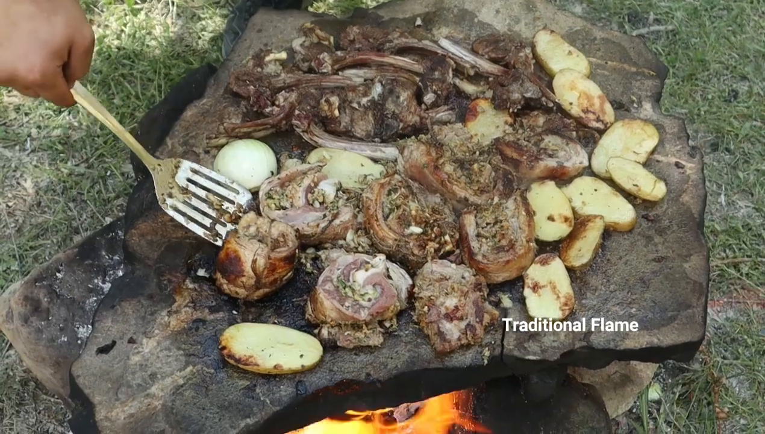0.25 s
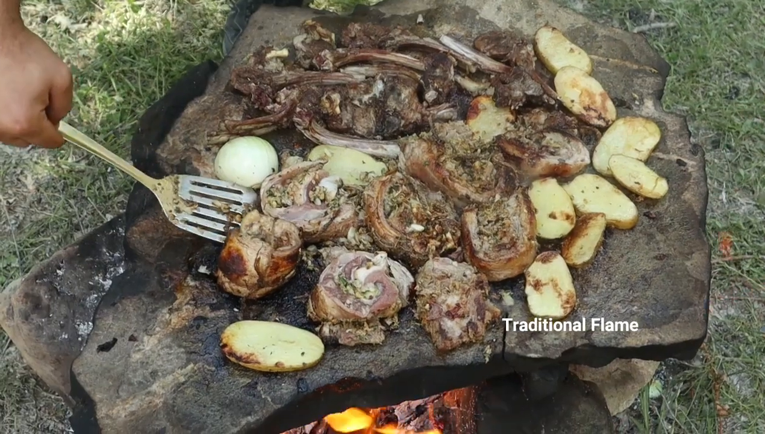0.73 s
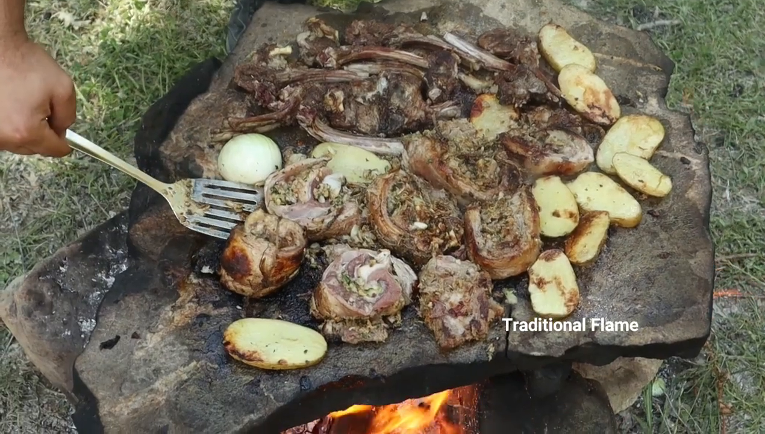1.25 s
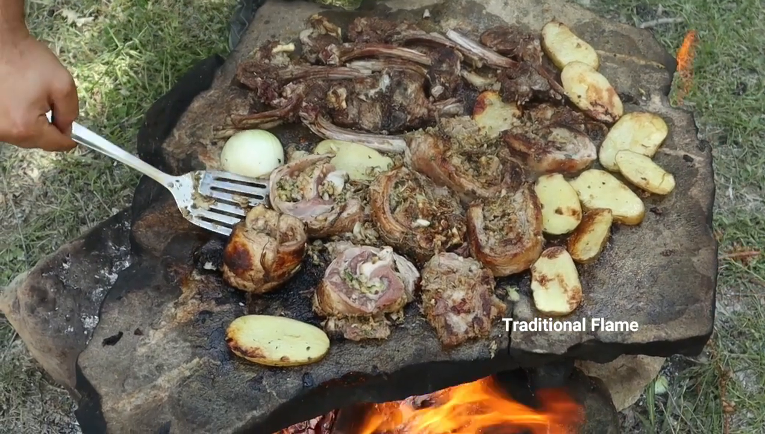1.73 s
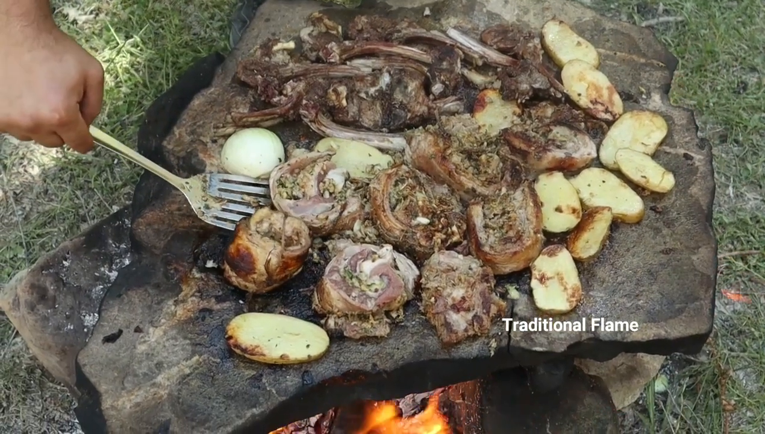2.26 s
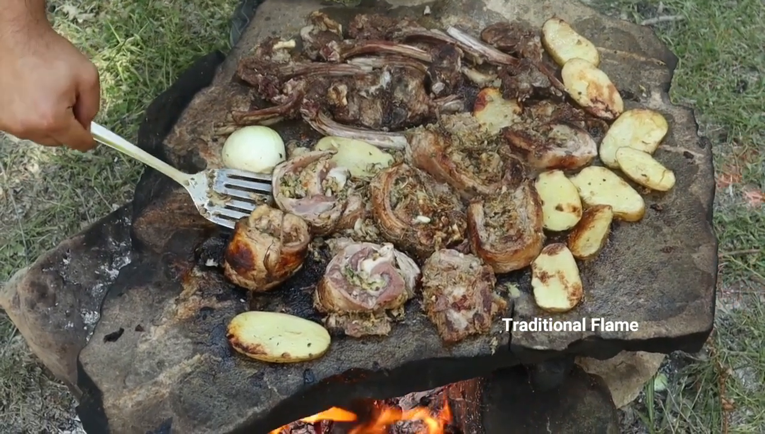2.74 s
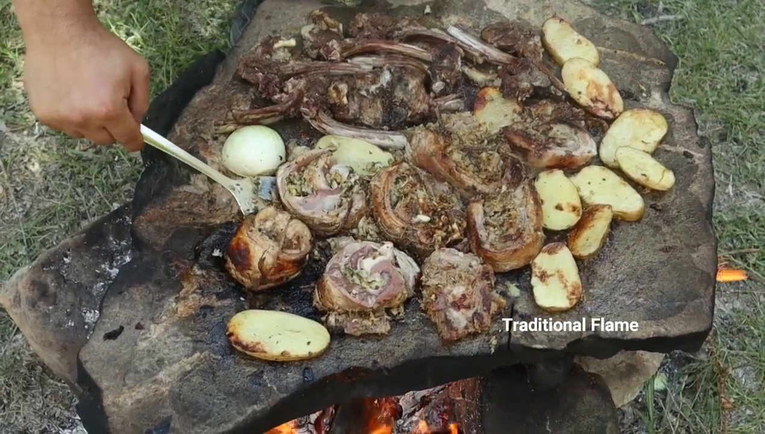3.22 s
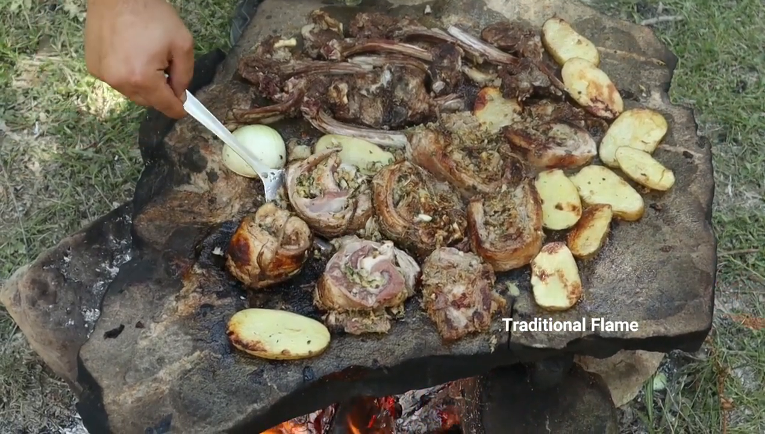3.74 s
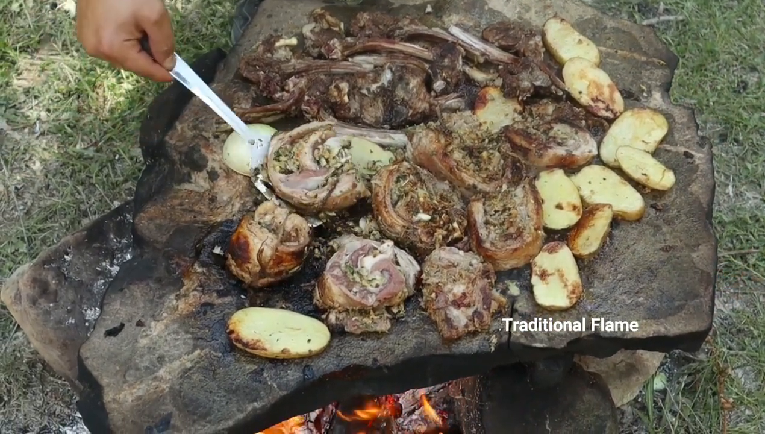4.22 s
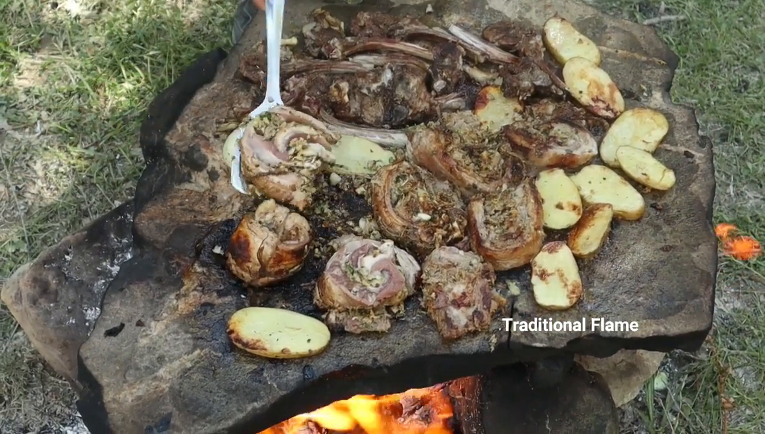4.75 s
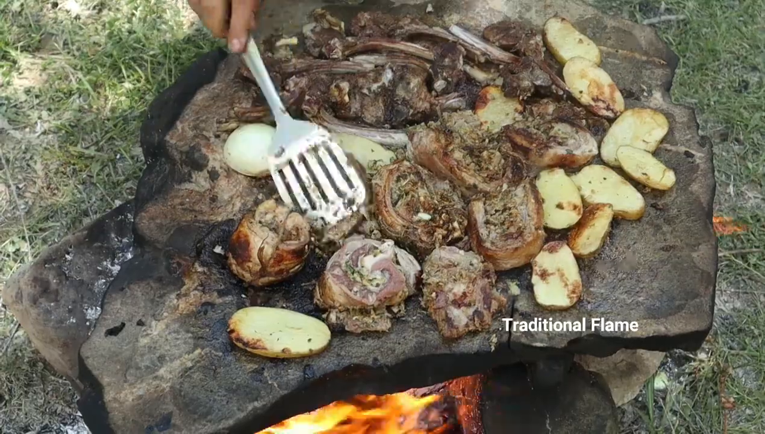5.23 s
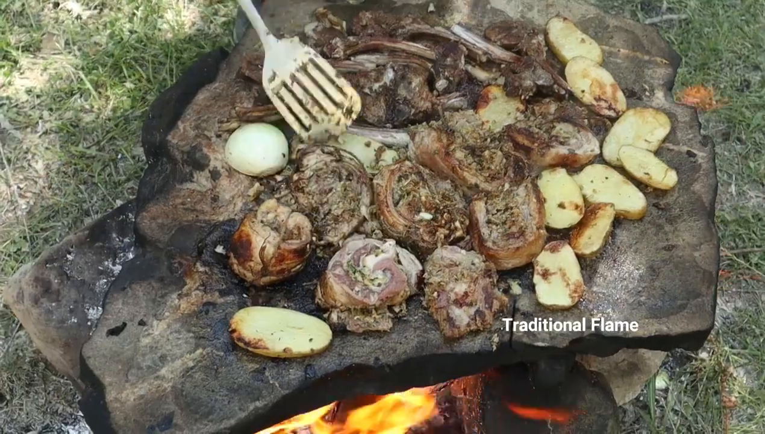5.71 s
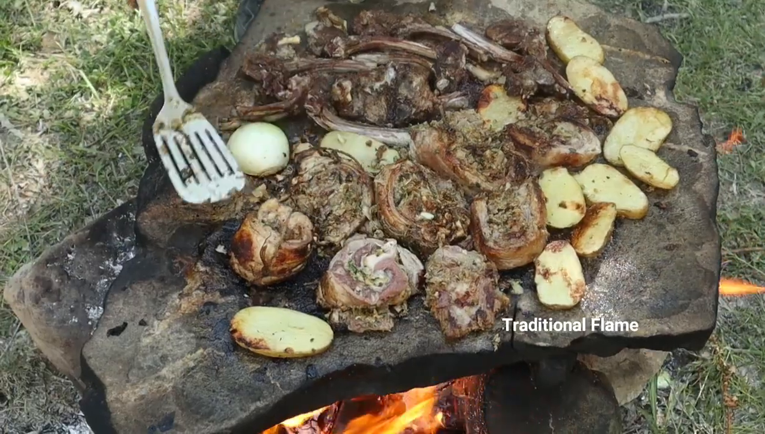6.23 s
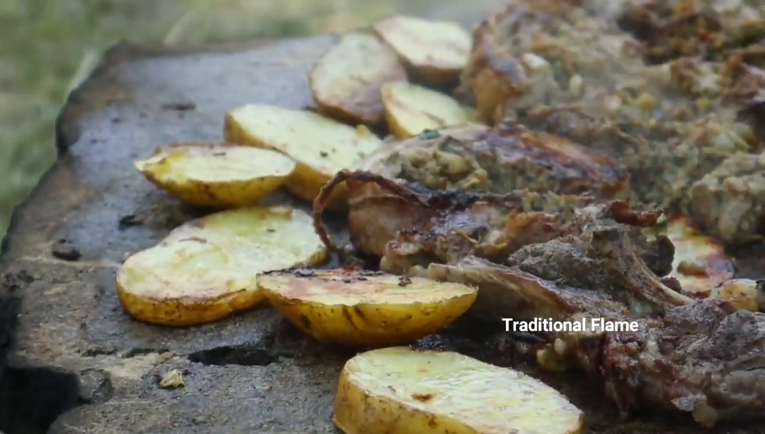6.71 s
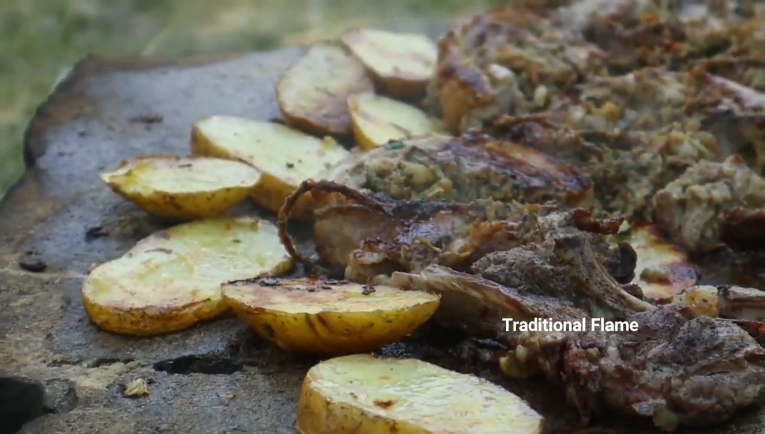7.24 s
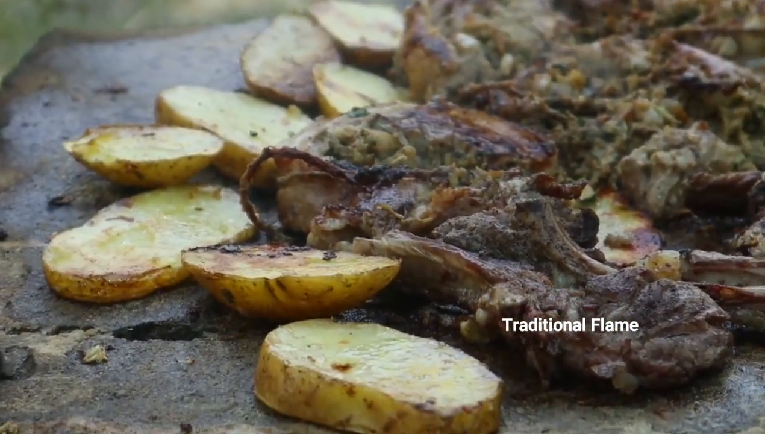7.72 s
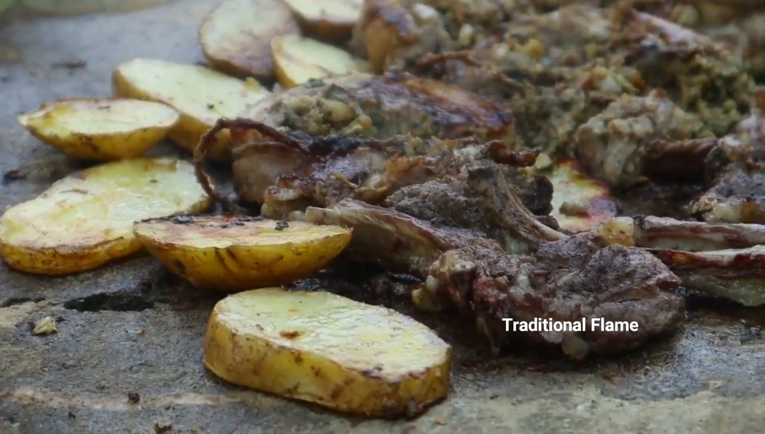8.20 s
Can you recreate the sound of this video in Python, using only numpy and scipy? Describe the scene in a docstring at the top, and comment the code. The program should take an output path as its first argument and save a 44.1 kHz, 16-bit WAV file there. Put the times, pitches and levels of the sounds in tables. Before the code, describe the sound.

Meat and potato slices sizzle and crackle on a hot stone outdoors, with sharp pops of fat and a faint fire rumble.

```python
"""Frying on a hot stone

Meat and potato slices sizzle on a slab over a wood fire, outdoors. Each bursting bubble of fat or juice
radiates a brief pressure pulse: small ones superpose into a fizz, large ones crackle and pop, most of
all while a slice is turned. Flames rumble and flutter below. The level dips for a moment, and the
frying returns a little calmer, heard from close above the potatoes."""
import sys
import numpy as np
from scipy import signal
from scipy.fft import rfft, irfft, next_fast_len
from scipy.io import wavfile
from scipy.ndimage import map_coordinates

SR = 44100
rng = np.random.default_rng(int(sys.argv[2]) if len(sys.argv) > 2 else 0)


def dump_mix(stems):
    """Bounce the given channels to the path in sys.argv[1] as a 16-bit WAV at rate SR."""
    frames = np.atleast_2d(stems).T  # one column per channel
    limited = np.clip(frames, -1, 1)  # hard clip at full scale
    pcm = np.round(limited * 32767).astype(np.int16)
    wavfile.write(sys.argv[1], SR, pcm)


N = 373086

# How hard the food fries, as the base level of its steam fizz: t/s, level/dB
FRYING_LEVEL = [(0, -49.5), (.5, -48), (.95, -45.3), (2, -45.5), (3.1, -46.7), (3.85, -49.3), (4.5, -47.3),
                (5.1, -48.3), (5.8, -46), (6.35, -46.5), (6.5, -48.8), (7, -50.3), (8.46, -50.8)]
# Juice runs onto the stone and flashes to steam: t/s, half width/s, extra fizz/dB
STEAM_SPURTS = [(.72, .1, 6.5), (1.8, .11, 4), (3.45, .05, 4), (4.45, .07, 2.5)]
# Spectra of crackling fat, spattering juice, steam and a searing wet face: f/Hz, relative level/dB
FAT_SPECTRUM = [(250, -38), (500, -13.5), (700, -3), (900, -2.5), (1100, -5), (1500, -1), (2400, 2),
                (3200, -2), (5000, -7), (10000, -37.5)]
JUICE_SPECTRUM = [(800, -23.5), (2200, -8.5), (3500, -1), (4500, -1), (5600, -2), (7000, -4.5),
                  (14000, -18.5)]
STEAM_SPECTRUM = [(1000, -27), (4000, -11.5), (6200, -6), (7400, -1), (8500, 1), (11000, -8), (13500, -4),
                  (15500, -8.5)]
SEARING_SPECTRUM = [(1200, -22.5), (1900, -0.5), (2500, -10.5), (3000, -8.5), (3500, 0.5), (4100, -0.5),
                    (5400, -14), (6800, 4), (8500, -9), (13000, -13)]
# The loudest single bursts of fat: t/s, level/dB, f/Hz
LOUD_POPS = [(0.031, -24.5, 2700), (0.1703, -24, 1500), (0.2234, -23, 5400), (0.7176, -16.5, 7900),
             (0.8914, -25, 2100), (1.091, -22, 2600), (1.2204, -15.5, 6000), (1.5214, -21, 2900),
             (1.5513, -21, 3500), (1.7296, -23, 2400), (1.7652, -23, 2400), (1.8796, -21, 2600),
             (1.9978, -18, 5270), (2.0495, -29, 1000), (2.1667, -22.5, 2600), (2.199, -23, 2400),
             (2.3472, -21, 2900), (2.4087, -23, 2500), (2.439, -14, 9300), (2.6317, -18.5, 3100),
             (2.7744, -16, 6300), (2.9028, -22, 2700), (2.9224, -23, 2800), (3.0518, -14.5, 7900),
             (3.2511, -19.5, 2300), (3.6948, -14, 7400), (3.911, -18.5, 6500), (3.9635, -23, 2900),
             (3.978, -23, 2800), (4.0066, -22, 2600), (4.1746, -19, 2300), (4.18, -20.5, 4200),
             (4.365, -20, 2700), (4.4462, -17, 7900), (4.4817, -17.5, 3900), (4.579, -21, 3300),
             (4.6346, -20.5, 3350), (4.6468, -19, 2410), (4.687, -11.5, 9100), (4.749, -14.5, 7700),
             (4.7857, -10, 6600), (4.7984, -15, 6300), (4.8195, -18, 6000), (4.8827, -21, 3400),
             (4.9287, -16.5, 6800), (5.0282, -20.5, 3200), (5.1543, -17, 6300), (5.294, -16.5, 4000),
             (5.3087, -17.5, 3900), (5.3566, -12, 5900), (5.409, -17.5, 6600), (5.753, -16.5, 5000),
             (5.7644, -18.5, 6000), (5.8298, -18, 4800), (5.8488, -20.5, 2090), (5.8887, -20, 3000),
             (5.9255, -21.5, 2000), (6.145, -12.5, 6000), (6.3133, -17, 3600), (6.3237, -22.5, 2200),
             (6.5096, -21, 3900), (6.7414, -17, 8200), (7.0248, -16.5, 3700), (7.2574, -24.5, 2220),
             (7.3058, -17, 10000), (7.7533, -21, 3300), (7.8606, -11, 9000), (8.1206, -19, 10000),
             (8.381, -19, 4700)]
# Spells of lesser pops (ordinary spitting, a spatula pressing fat out, the turn, calmer potatoes):
# start/s, end/s, rate/(1/s), level/dB, f/Hz, pitch scatter/octaves
POP_SPELLS = [(0, 6.4, 6, -26, 4400, .5), (.85, 3.0, 15, -28, 2650, .2), (4.2, 6.4, 28, -23.3, 4700, .42),
              (6.42, 8.46, 10, -26, 3800, .42)]
# Swell time of a pop against its pitch: f/Hz, rise/cycles
POP_RISE = [(1200, 0.34), (2500, 0.59), (3600, 0.49), (6000, 0.38)]
# Searing as a slice is lifted and laid on its wet side: t/s, level/dB
SEARING_LEVEL = [(4.2, -75), (4.7, -50), (5.15, -49), (5.35, -46.5), (5.6, -46.5), (5.8, -42.5),
                 (6.05, -47), (6.38, -47.5), (6.42, -80)]
# Radiation of a pop (a small source gives little bass), its spray, and droplet ticks: f/Hz, gain/dB
POP_RADIATION = [(100, -20), (450, -8), (750, -1), (15000, 0.5)]
SPRAY_SPECTRUM = [(400, -18), (800, 1), (2500, 0), (6000, -4.5), (15000, -7)]
TICK_SPECTRUM = [(300, -18), (800, 0), (15000, 2)]
# The fire flares up: start/s, length/s, extra rumble/dB, extra flutter/dB
FIRE_FLARES = [(.35, .4, 9, .5), (2.15, .17, 6, -1), (3.3, .85, 6, 7.5), (5.7, .6, 4.5, 1),
               (6.4, .35, 11, 1.5), (8.1, .4, 6, 5)]
# Spectra of the flames and the open air: f/Hz, relative level/dB
RUMBLE_SPECTRUM = [(20, -1.5), (80, 0), (135, -7), (600, -45)]
FLUTTER_SPECTRUM = [(60, -20), (125, -6), (165, -3.5), (200, 0.5), (340, -7), (1000, -36)]
AIR_SPECTRUM = [(200, -5), (480, -3), (900, 0.5), (8000, -24)]
# Change of timbre close above the potatoes: f/Hz, gain/dB
CLOSE_COLOUR = [(450, 1.5), (850, -3.5), (1500, 1.5), (2000, 1), (3600, -1), (4700, 1.5), (6300, -1),
                (8500, 0), (12500, 0)]
# A notch and a slight lift in the treble of the whole sound: f/Hz, gain/dB
TREBLE_COLOUR = [(8600, 0), (9400, -3), (10300, -6.5), (11300, -0.5), (12500, 1), (15000, 2)]
# A brief dip of the whole sound: t/s, gain/dB
LEVEL_DIP = [(6.385, 0), (6.392, -40), (6.412, -48), (6.419, -16), (6.423, 0)]


def amp(db):
    """Amplitude ratio of a level in decibels."""
    return 10 ** (np.asarray(db) / 20)


def unit(x):
    """Normalisation to rms 1."""
    return x / np.sqrt(np.mean(x ** 2) + 1e-20)


def envelope(rows):
    """Linear interpolation of (t/s, level/dB) rows to one level per sample."""
    return np.interp(np.arange(N) / SR, *np.transpose(rows))


def wobble(rate):
    """Slow random modulation: a spline through `rate` Gaussian values a second."""
    knots = rng.standard_normal(int(N * rate / SR) + 4)
    return map_coordinates(knots, [np.arange(N) * rate / SR])


def low_pass(x, cutoff_hz):
    """Ideal low-pass filtering: components above the cutoff are removed."""
    size = next_fast_len(N + SR // 2)
    passband = np.fft.rfftfreq(size, 1 / SR) < cutoff_hz
    return irfft(rfft(x, size) * passband, size)[:N]


def coloured(x, points, size=8192):
    """Minimum-phase filtering with the gains of (f/Hz, gain/dB) points."""
    hz, db = np.transpose(points)
    gain = amp(np.interp(np.log(np.fft.rfftfreq(size, 1 / SR) + 1), np.log(hz), db))
    cepstrum = irfft(np.log(gain))[:size // 2]
    cepstrum[1:] *= 2  # folding the cepstrum makes the filter causal
    impulse_response = irfft(np.exp(rfft(cepstrum, size)))
    return signal.fftconvolve(x, impulse_response)[:N]


def noise(spectrum):
    """Spectrally shaped Gaussian noise of rms 1."""
    return unit(coloured(rng.standard_normal(N), spectrum))


def bursts(onset_s, db, hz, rise, size):
    """Heavily damped oscillation: each bubble's pulse swells for `rise` cycles, then dies away."""
    index = np.ceil(onset_s * SR).astype(int)[:, None] + np.arange(size)
    cycles = hz[:, None] * (index / SR - onset_s[:, None])
    age = cycles / np.maximum(rise, .1)[:, None]
    pressure = -amp(db)[:, None] * np.sin(2 * np.pi * cycles) * age * np.exp(1 - age)
    return np.bincount(np.maximum(index, 0).ravel(), pressure.ravel(), N)[:N]


def bubbling(spectrum, rate, hz, octaves, rise, spread_db, range_db, hiss, size):
    """Shot noise of rms near 1: `rate` bursts a second, the smallest merged into a power share `hiss`."""
    count = int(rate * N / SR)
    when, chance, pitch, life = rng.random((count, 4)).T
    # levels are exponentially distributed, up to a largest bubble
    db = -spread_db * np.log(1 - chance * (1 - np.exp(-range_db / spread_db)))
    burst_hz = hz * 2 ** (octaves * (2 * pitch - 1))
    swarm = bursts(when * N / SR, db, burst_hz, rise * (.5 + life), size)
    return np.sqrt(1 - hiss) * unit(coloured(swarm, spectrum)) + np.sqrt(hiss) * noise(spectrum)


def sizzle(fat_db=-50.9, juice_db=-49.0, steam_db=-47):
    """Incoherent superposition: fat crackles low, juice spatters higher and steam fizzes on top."""
    t = np.arange(N) / SR
    heat_db = envelope(FRYING_LEVEL) - steam_db  # relative to an ordinary simmer
    spurt_db = sum(db * np.exp(-((t - s) / width) ** 2) for s, width, db in STEAM_SPURTS)
    lift_db = -2.8 * np.exp(-((t - 4.8) / .9) ** 2)  # less crackle while the slice is prised off
    surge = wobble(22)  # steam escapes unevenly
    shared_db = .36 * spurt_db + .6 * surge
    fat = bubbling(FAT_SPECTRUM, rate=1500, hz=2200, octaves=.81, rise=.28,
                   spread_db=5.5, range_db=21.5, hiss=.36, size=128)
    juice = bubbling(JUICE_SPECTRUM, rate=1800, hz=4220, octaves=.8, rise=.33,
                     spread_db=6, range_db=24.5, hiss=.18, size=64)
    steam = bubbling(STEAM_SPECTRUM, rate=3500, hz=8900, octaves=.71, rise=.31,
                     spread_db=6, range_db=26, hiss=.32, size=32)
    return (amp(fat_db + .1 * heat_db + lift_db + shared_db + .55 * wobble(25)) * fat
            + amp(juice_db + .3 * heat_db + shared_db) * juice
            + amp(steam_db + heat_db + spurt_db + .7 * surge) * steam)


def pop_spell(start, end, rate, db, hz, octaves, db_per_octave=3.6, scatter_db=1.5):
    """A random point process of lesser pops, as rows of t/s, level/dB, f/Hz."""
    count = int(rate * (end - start))
    onset_s = rng.uniform(start, end, count)
    pitch, strength = np.clip(rng.standard_normal((count, 2)), -2, 2).T
    # smaller, higher bubbles burst with a sharper peak
    level_db = db + db_per_octave * octaves * pitch + scatter_db * strength
    return np.column_stack([onset_s, level_db, hz * 2 ** (octaves * pitch)])


def pops(hollow_hz=800, hollow_db=-22.5, hollow_t60=.0074, spray_db=-17.5, spray_t60=.0028):
    """Impulse excitation: each large burst rings a hollow under the food and trails a spray of fat."""
    onset_s, db, hz = np.vstack([LOUD_POPS] + [pop_spell(*spell) for spell in POP_SPELLS]).T
    rise = np.interp(hz, *np.transpose(POP_RISE))
    direct = coloured(bursts(onset_s, db, hz, rise, size=256), POP_RADIATION)
    t = np.arange(SR // 100) / SR
    knock = np.sin(2 * np.pi * hollow_hz * t) * amp(hollow_db - 60 * t / hollow_t60)
    spray_envelope, hollow = np.zeros((2, N + SR))
    for start, level, pitch in zip(onset_s, db, hz):
        first = round(start * SR)
        coupling = min(1, 2500 / pitch)  # big, low bubbles push more air
        hollow[first:first + len(t)] += amp(level) * knock * coupling
        spray_envelope[first:first + len(t)] += amp(level - 60 * t / spray_t60)
    return direct + hollow[:N] + amp(spray_db) * spray_envelope[:N] * noise(SPRAY_SPECTRUM)


def searing():
    """Cavity resonance: pockets under the turned slice colour the spitting of its wet side."""
    spit = bubbling(SEARING_SPECTRUM, rate=600, hz=4400, octaves=1, rise=.28,
                    spread_db=9, range_db=24, hiss=.05, size=64)
    return amp(envelope(SEARING_LEVEL)) * spit


def droplet_ticks():
    """Short pulses have broad spectra: droplets flung onto the hot stone snap brightly."""
    snaps = bubbling(TICK_SPECTRUM, rate=220, hz=7800, octaves=.8, rise=.24,
                     spread_db=8, range_db=16, hiss=0, size=64)
    return amp(-52 + 1.5 * wobble(20)) * snaps


def echo(x, t60=.037, onset_s=.00045):
    """Diffuse reflection: slab and ground scatter the sound into a very short, decaying tail."""
    t = np.arange(SR // 20) / SR
    tail = rng.standard_normal(len(t)) * amp(-60 * t / t60) * (1 - np.exp(-t / onset_s))
    return signal.fftconvolve(x, tail / np.linalg.norm(tail))[:N]


def fire(rumble_db=-69.5, flutter_db=-63.9, rise_s=.2, fall_s=.25):
    """Combustion noise: flames rumble and flutter in two low bands that swell as the fire flares."""
    start, length, extra_rumble_db, extra_flutter_db = np.transpose(FIRE_FLARES)
    age = np.arange(N) / SR - start[:, None]
    growth = np.clip(age / rise_s, 0, 1)
    decay = np.exp(-np.maximum(age - length[:, None], 0) / fall_s)
    flare = growth * decay
    rumble = amp(rumble_db + extra_rumble_db @ flare + 1.3 * wobble(9)) * noise(RUMBLE_SPECTRUM)
    flutter = amp(flutter_db + extra_flutter_db @ flare + 1.5 * wobble(16)) * noise(FLUTTER_SPECTRUM)
    return rumble + flutter


def open_air():
    """Stationary ambient noise: the soft rush of the outdoors."""
    return amp(-60) * noise(AIR_SPECTRUM)


def scene(close_from_s=6.405):
    """Linear superposition of the food (heard from above, then close by), its echo, fire and air."""
    food = sizzle() + searing() + droplet_ticks() + pops()
    food = food + amp(-16.5) * echo(food)
    food = np.where(np.arange(N) / SR < close_from_s, food, coloured(food, CLOSE_COLOUR))
    return (food + fire() + open_air())[None]


def record(dry):
    """Filtering and gain: the treble is coloured, the level dips briefly and the band is limited."""
    sound = coloured(dry[0], TREBLE_COLOUR) * amp(envelope(LEVEL_DIP))
    return low_pass(sound, cutoff_hz=15500)[None]


dry = scene()
out = record(dry)
dump_mix(out)
```